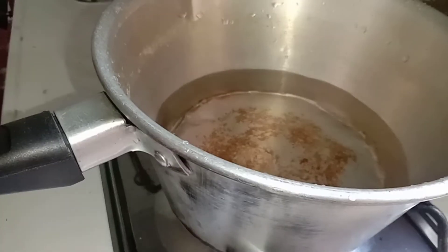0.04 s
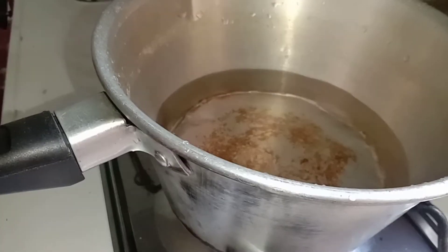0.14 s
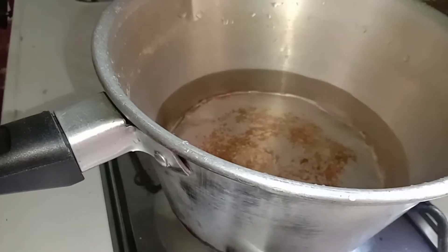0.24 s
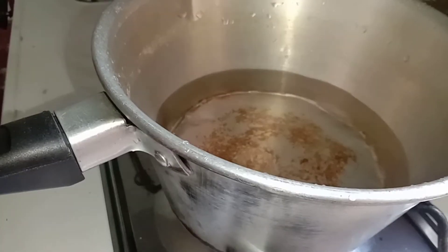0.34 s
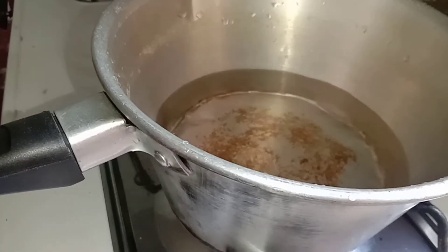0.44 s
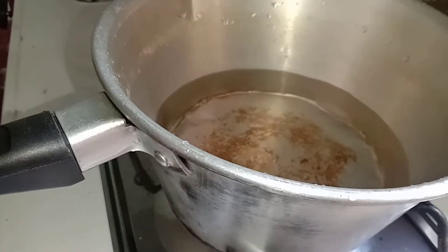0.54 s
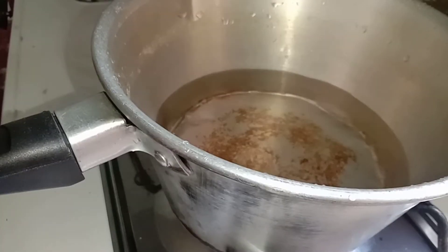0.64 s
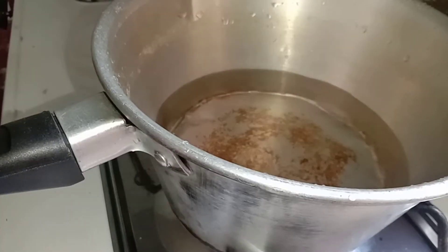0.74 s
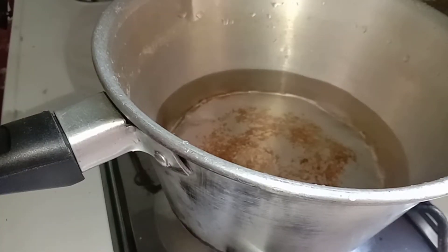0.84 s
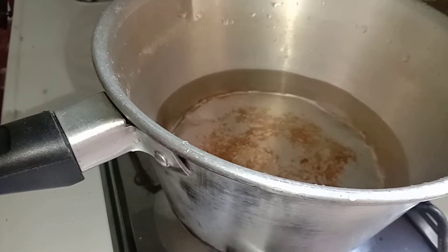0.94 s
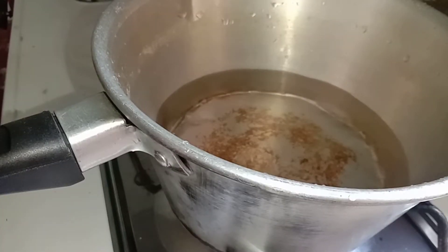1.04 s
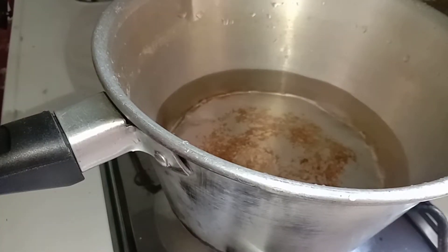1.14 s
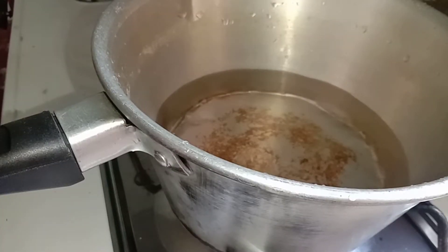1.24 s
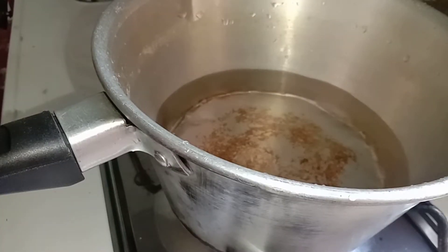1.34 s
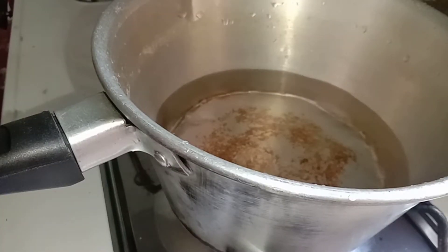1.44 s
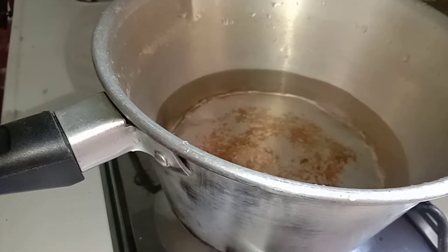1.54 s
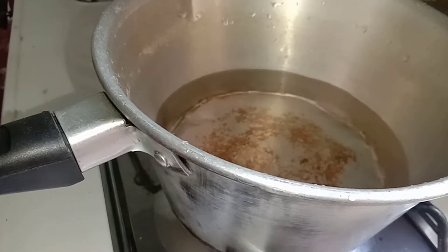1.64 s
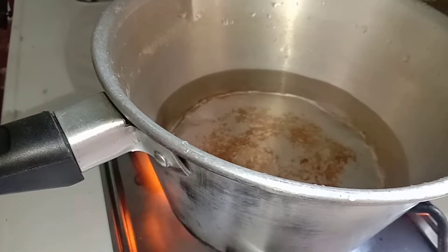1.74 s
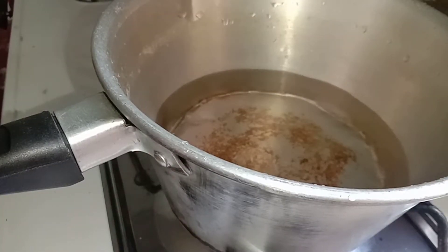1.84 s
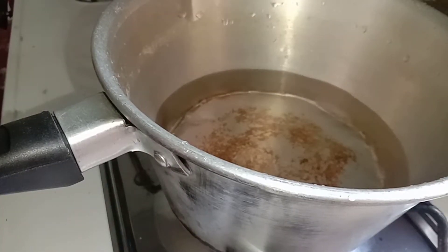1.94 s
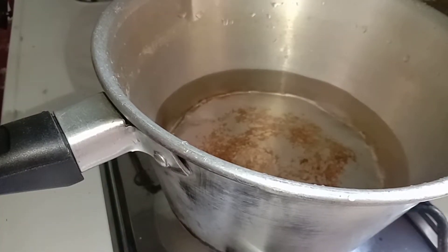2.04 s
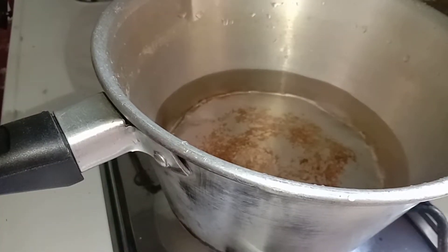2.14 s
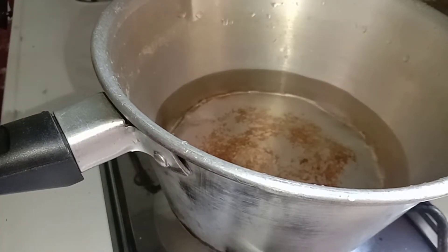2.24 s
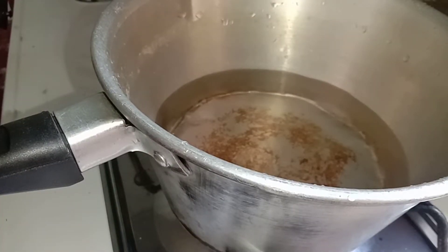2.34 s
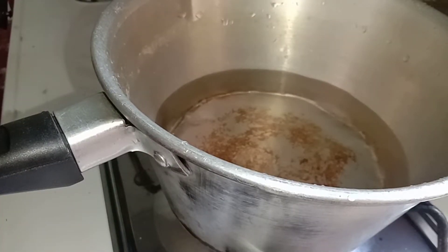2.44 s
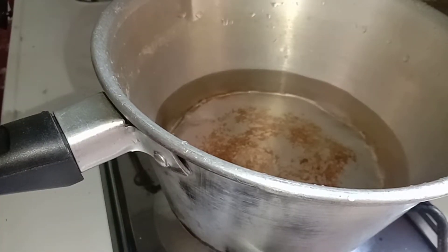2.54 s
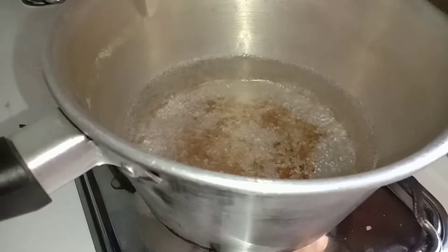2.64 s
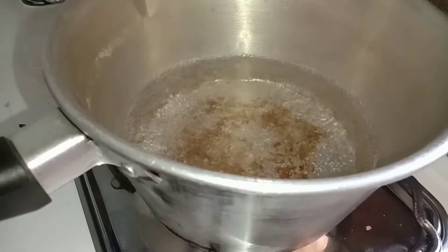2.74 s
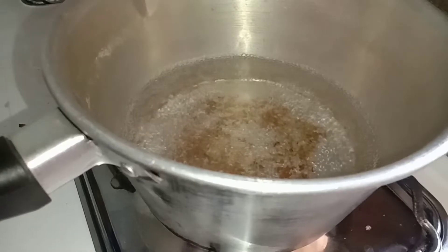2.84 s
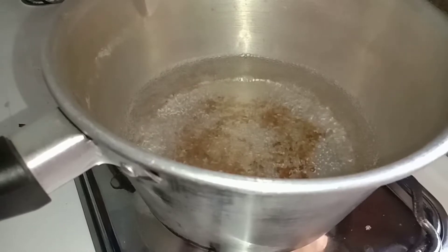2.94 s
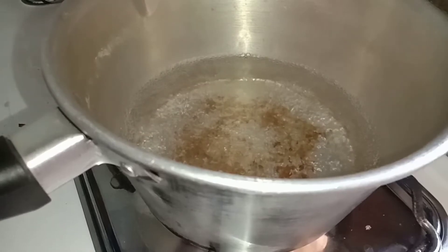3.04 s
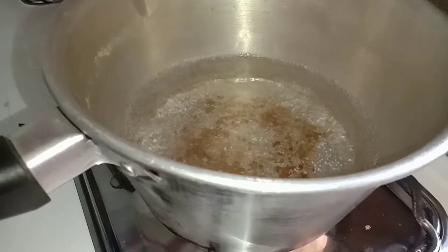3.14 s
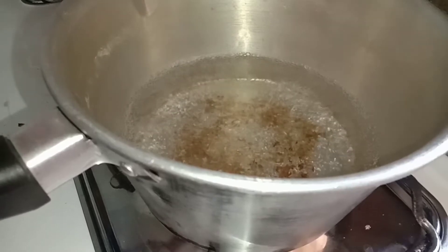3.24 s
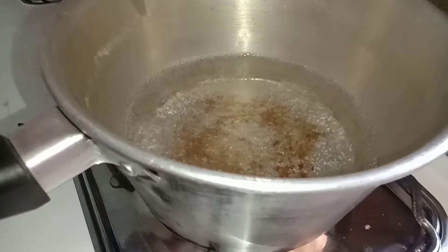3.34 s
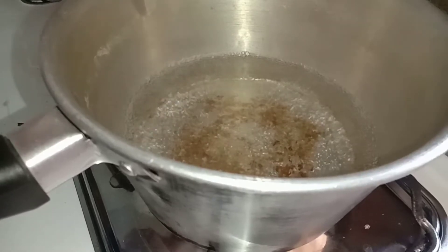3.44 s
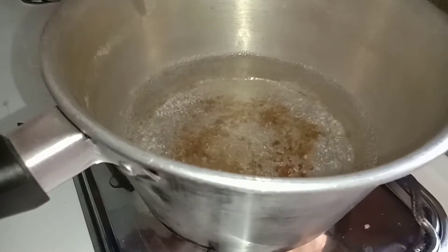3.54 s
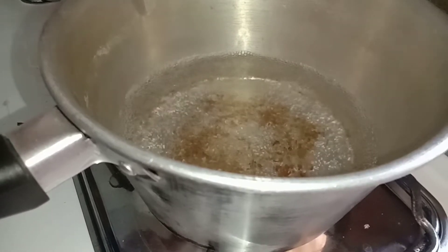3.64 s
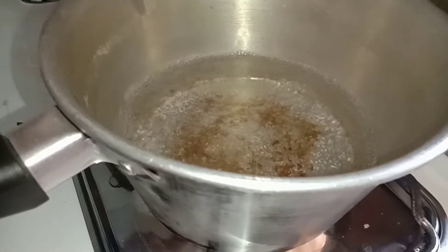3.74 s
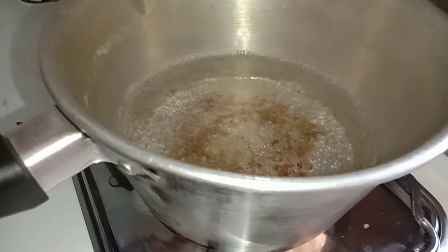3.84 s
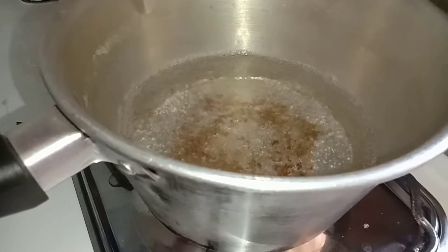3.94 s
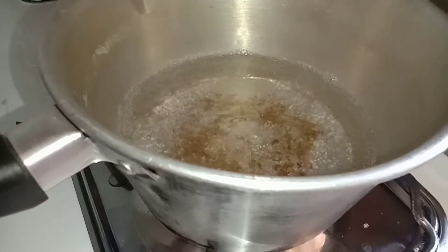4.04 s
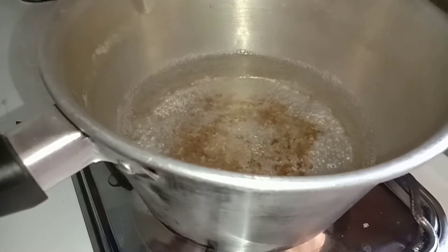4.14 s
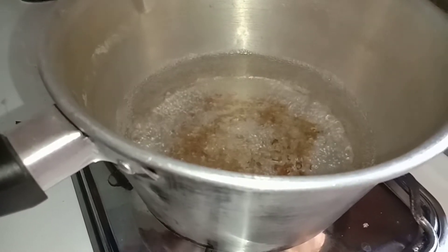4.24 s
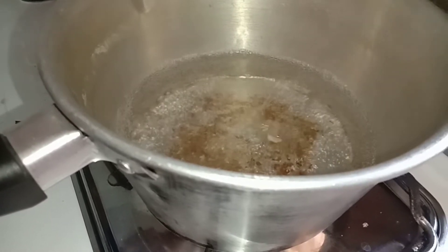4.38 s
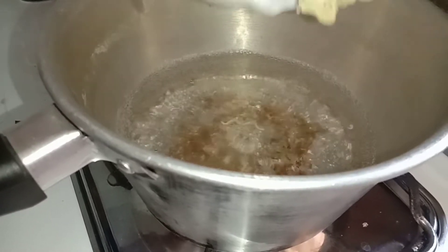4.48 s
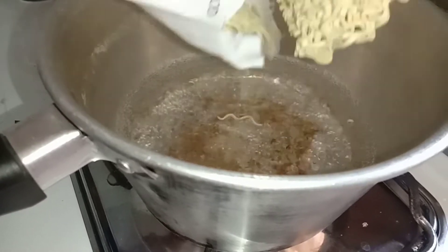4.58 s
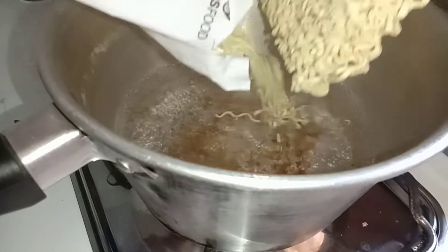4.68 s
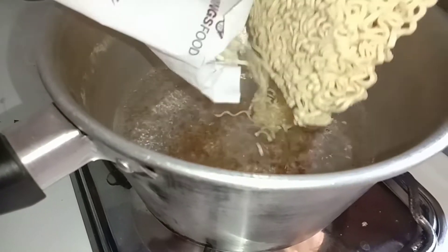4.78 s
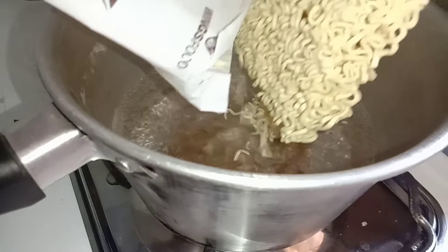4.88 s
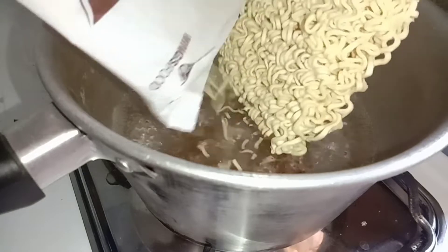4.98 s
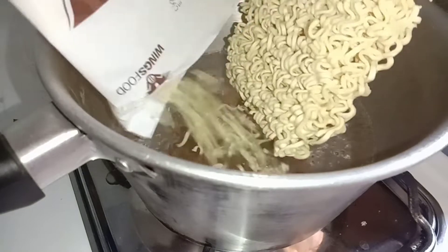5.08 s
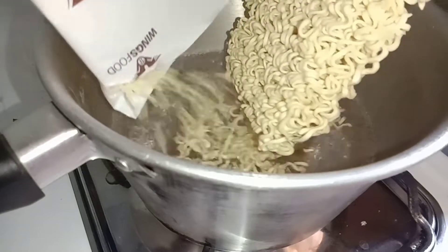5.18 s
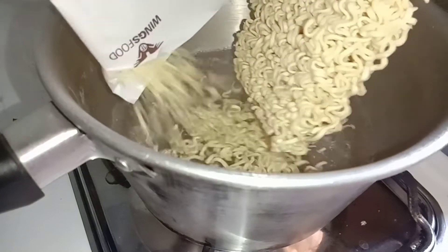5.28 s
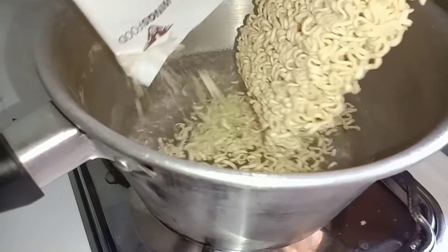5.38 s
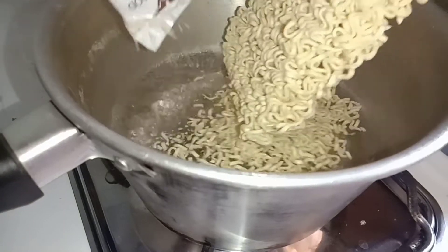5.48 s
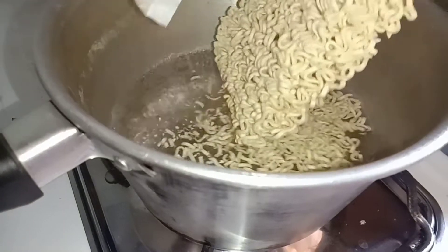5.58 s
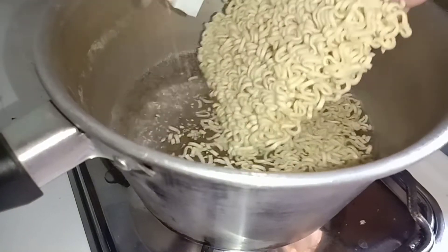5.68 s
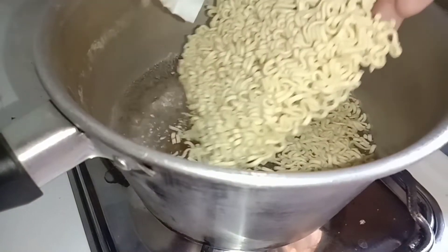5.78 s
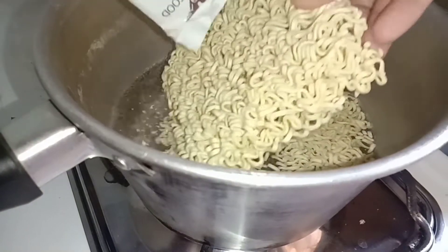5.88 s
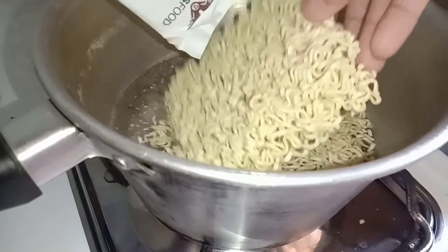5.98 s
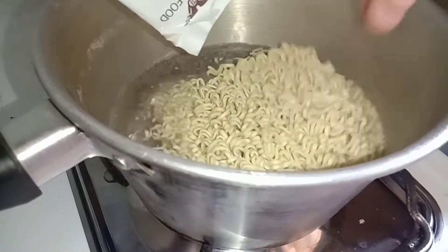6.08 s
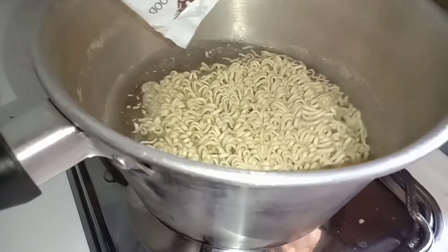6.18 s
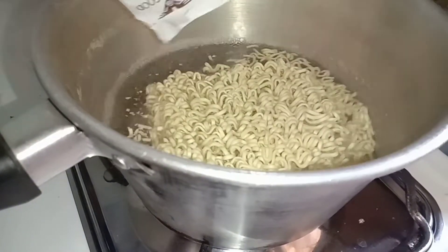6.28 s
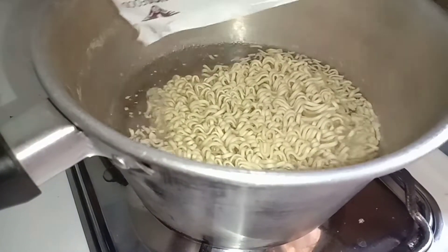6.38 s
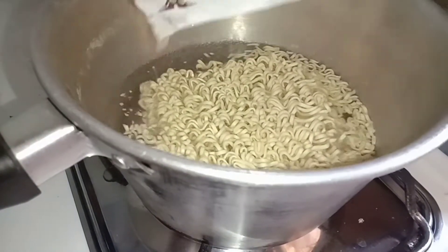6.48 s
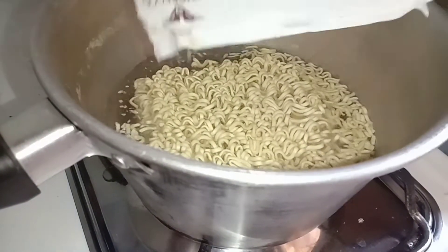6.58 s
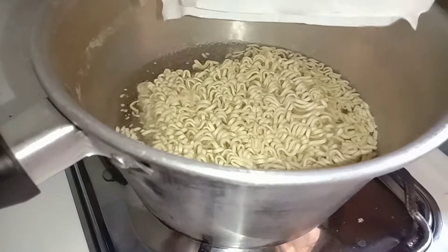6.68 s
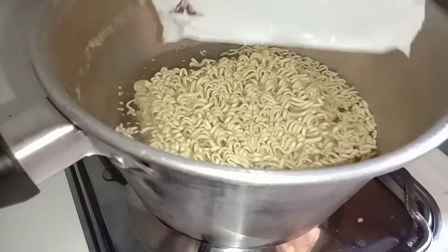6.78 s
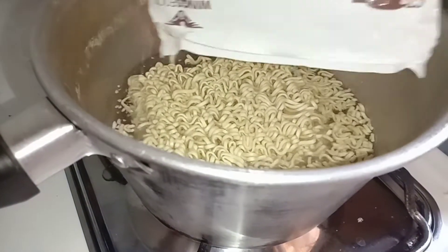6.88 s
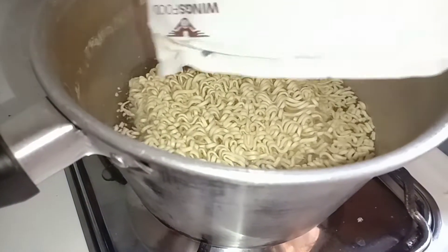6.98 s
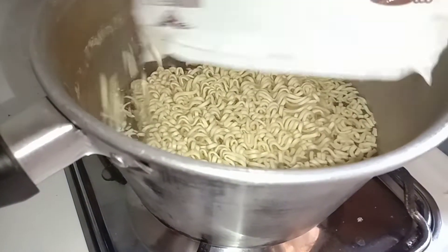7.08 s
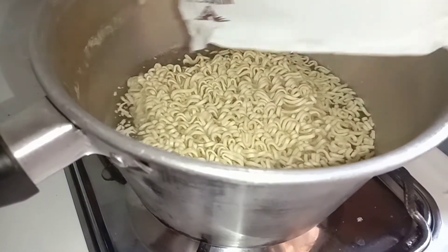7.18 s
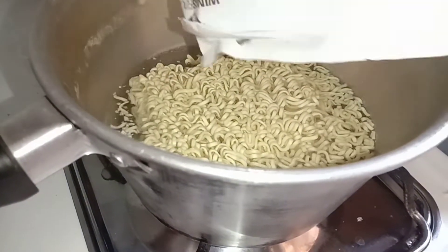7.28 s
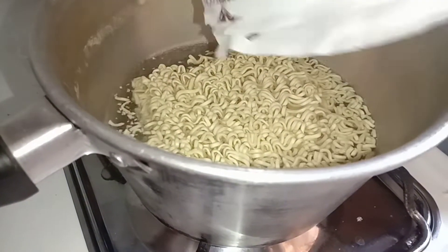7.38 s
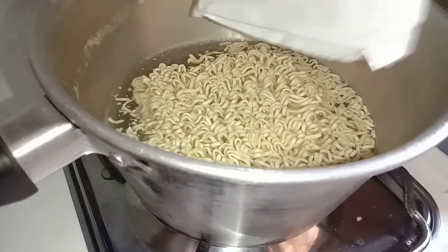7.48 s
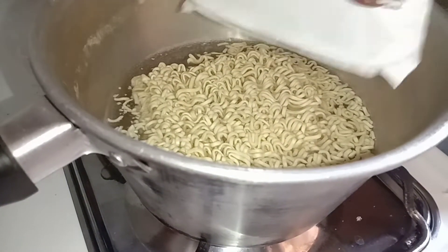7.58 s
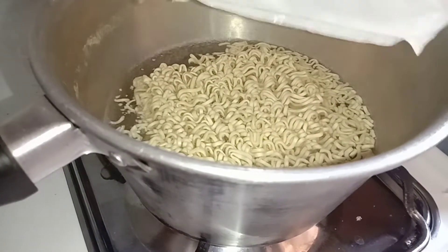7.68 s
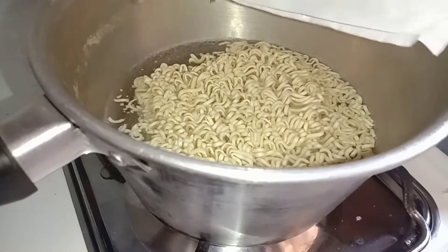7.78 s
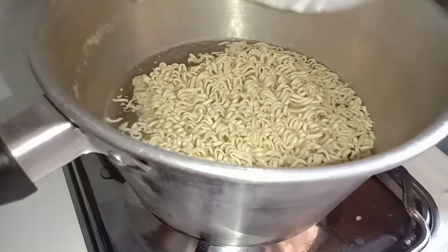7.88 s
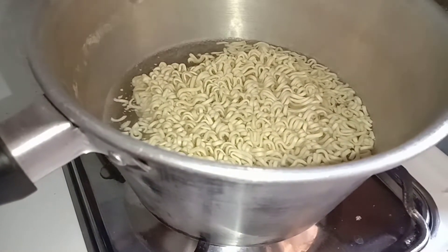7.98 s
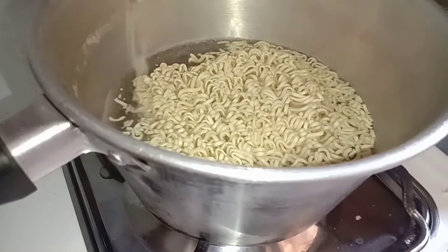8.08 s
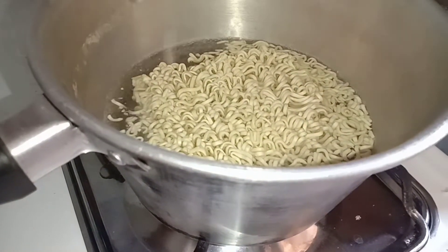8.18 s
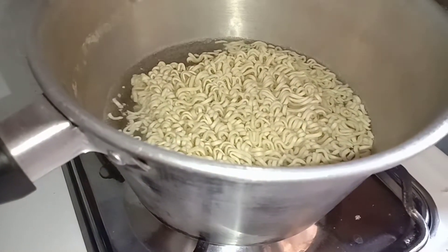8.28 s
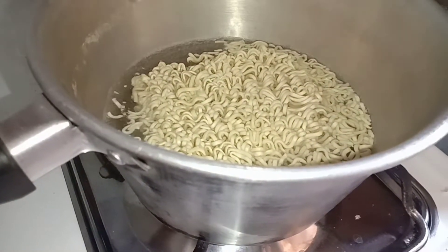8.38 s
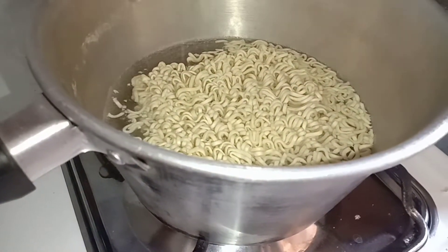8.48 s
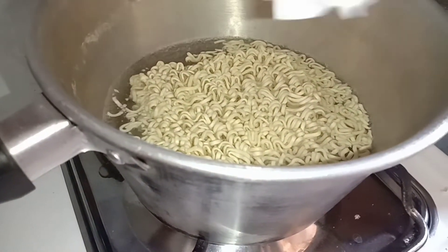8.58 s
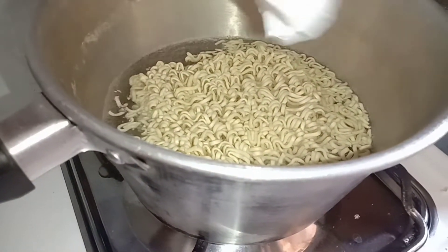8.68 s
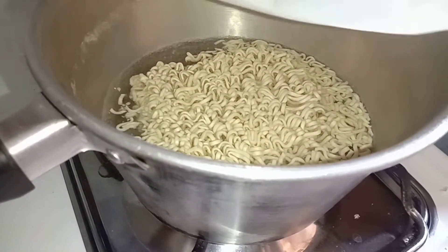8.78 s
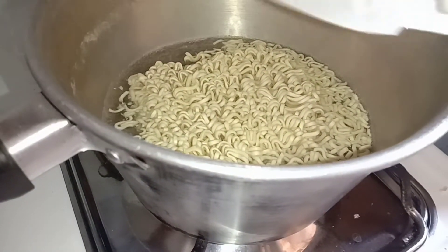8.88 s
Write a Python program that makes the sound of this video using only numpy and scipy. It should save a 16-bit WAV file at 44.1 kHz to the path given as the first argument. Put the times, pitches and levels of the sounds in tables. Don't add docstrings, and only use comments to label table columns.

```python
import sys
import numpy as np
from scipy import signal
from scipy.fft import rfft, irfft, next_fast_len
from scipy.io import wavfile
from scipy.ndimage import map_coordinates

SR = 44100
rng = np.random.default_rng(int(sys.argv[2]) if len(sys.argv) > 2 else 0)


def generate_wav(sig):
    pcm = np.round(np.clip(np.atleast_2d(sig).T, -1, 1) * 32767).astype(np.int16)
    wavfile.write(sys.argv[1], SR, pcm)


def volts_from_decibels(level):
    exponent = np.asarray(level, float) / 20
    return 10 ** exponent


N = 393372
T = np.arange(N) / SR
SIZE = next_fast_len(N + SR)
HZ = np.maximum(np.arange(SIZE // 2 + 1) * SR / SIZE, 1)

BANG_S, CUT_S = 1.5905, 2.535
BLOCK_S = 6.035

# [f/Hz, density/dB per Hz]
FILM_SPECTRUM = [(150, -25), (250, -26.5), (1080, 1.5), (1260, -2.5), (1820, -0.5), (3060, 0.5), (6140, -2),
                 (7190, -1), (13400, -16), (15300, -16), (16000, -42)]
# [f/Hz, width/Hz, boost/dB]
PORT_RESONANCES = [(1280, 124, 11.5), (3300, 1290, 4), (5440, 730, 5), (7200, 580, 5.5), (15170, 710, 9.5)]


def rms_one(x):
    return x / np.sqrt(np.mean(x ** 2) + 1e-20)


def in_time(table):
    s, *columns = np.transpose(table)
    return [np.interp(T, s, column) for column in columns]


def by_stage(values):
    return np.asarray(values)[(T > BANG_S) * 1 + (T > CUT_S)]


def on_hz(points):
    hz, db = np.transpose(points)
    return np.interp(np.log(HZ), np.log(hz), db)


def hump(hz, width_hz, db):
    return db / (1 + (2 * (HZ - hz) / width_hz) ** 2)


def colour(x, db):
    fold = irfft(np.maximum(db, -100) * np.log(10) / 20, SIZE)
    fold[1:SIZE // 2] *= 2
    fold[SIZE // 2 + 1:] = 0
    return irfft(rfft(x, SIZE) * np.exp(rfft(fold)), SIZE)[..., :N]


def band(x, low_hz, high_hz):
    return signal.sosfilt(signal.butter(2, [low_hz, high_hz], "band", fs=SR, output="sos"), x)


def white():
    return rng.standard_normal(N)


def noise(spectrum):
    phases = np.exp(2j * np.pi * rng.random(len(HZ)))
    return rms_one(irfft(volts_from_decibels(on_hz(spectrum)) * phases, SIZE)[:N])


def drift(rate):
    knots = rng.standard_normal(2000)
    coarse = map_coordinates(knots, [T[::32] * min(rate, 100) * 2 + 5], order=3)
    return np.interp(T, T[::32], coarse)


def mottled(x, patchy_db, rate):
    edges = 180 * 2 ** np.arange(0, 7, .5)
    return rms_one(sum(volts_from_decibels(patchy_db * drift(rate)) * band(x, low, high)
                       for low, high in zip(edges, edges[1:])))


def grains(per_s, spread_db):
    sizes = volts_from_decibels(spread_db * np.minimum(rng.exponential(1, N), 4.2)) * rng.choice([-1, 1], N)
    return sizes * (rng.random(N) < per_s / SR)


def click(s, db):
    out = np.zeros(N)
    out[int(s * SR)] = volts_from_decibels(db)
    return out


def dying(clicks, t60):
    return signal.lfilter([1], [1, -volts_from_decibels(-60 / (t60 * SR))], clicks + 1e-18)


def swells(rows, rise_db_per_s):
    t, power = T[::32], 1e-11
    for s, db, hold, fall in rows:
        before, after = np.maximum(s - t, 0), np.maximum(t - s - hold, 0)
        power = power + volts_from_decibels(2 * (db - rise_db_per_s * before - fall * after))
    return np.interp(T, t, 10 * np.log10(power))


def reverb(x, t60):
    t = np.arange(SR) / SR
    tail = rng.standard_normal(SR) * volts_from_decibels(-60 * t / t60) * np.clip(t / 0.011, 0, 1)
    tail = signal.lfilter([1], [1, -.4], tail)
    return signal.fftconvolve(x, tail / np.sqrt(np.sum(tail ** 2)))[:N]


def background():
    # [t/s, level/dB]
    draught = [(0.0, -61), (0.44, -54.5), (1.57, -54), (2.0, -49.5), (2.366, -52), (2.53, -37), (2.63, -62),
               (2.94, -44.5), (3.49, -51), (4.31, -52), (4.6, -59.5), (5.2, -53.5), (5.85, -63.5),
               (6.06, -58.5), (6.73, -57), (7.08, -57), (8.92, -48.5)]
    stages = [
        (-55.5, -64, 0.96),
        (-49.5, -55, 0.22),
        (-65.5, -70, 0.76),
    ]
    # [f/Hz, density/dB per Hz]
    rumble_spectrum = [(15, -45), (35, -12.5), (81, -11.5), (113, -1), (146, -2.5), (344, -19.5),
                       (400, -38), (520, -45), (880, -120)]
    # [f/Hz, density/dB per Hz]
    air_spectrum = [(120, -21), (200, -3), (413, -2.5), (524, -11.5), (1030, -8.5), (1250, -11),
                    (3000, -24.5), (3900, -54), (6600, -120)]
    # [f/Hz, density/dB per Hz]
    hiss_spectrum = [(880, -13), (1500, -1), (4920, -11), (5770, -16), (6370, -19.5), (7170, -13),
                     (8240, -28), (9470, -17), (16000, -68.5)]
    rumble_db, = in_time(draught)
    air_db, hiss_db, follows = by_stage(stages).T
    swing_db = follows * (rumble_db + 55)
    rumble = volts_from_decibels(rumble_db + 2.3 * drift(13)) * noise(rumble_spectrum)
    air = colour(white(), on_hz(air_spectrum) + hump(520, 60, 3))
    air = volts_from_decibels(air_db + swing_db + 3) * mottled(air, patchy_db=1.8, rate=9)
    hiss = volts_from_decibels(hiss_db + swing_db + 1.0 * drift(3.47)) * noise(hiss_spectrum)
    return rumble + air + hiss


def burner():
    db = -61 + 4 * T + 1.3 * drift(14.0)
    fade_in = np.clip(T / 0.061, 0, 1)
    return (T < CUT_S) * fade_in * volts_from_decibels(db) * rms_one(band(white(), 493, 552))


def engine():
    # [t/s, main order f/Hz, level/dB]
    course = [(0.0, 117.0, -65), (0.328, 115.7, -43.5), (0.95, 117, -45.5), (1.2, 118.3, -58),
              (1.55, 115.1, -66), (1.9, 116.5, -60), (2.082, 116.4, -44.5), (2.53, 116.5, -52.5),
              (2.63, 111.4, -58), (2.89, 110.5, -39.5), (4.25, 113.6, -48.5), (4.53, 111.3, -51),
              (4.8, 124.1, -94), (5.4, 110, -110)]
    upper_db = (-31, -12, -5.5)
    hz, main_db = in_time(course)
    phase = 2 * np.pi * np.cumsum(hz * (1 + .006 * drift(4))) / SR
    main = volts_from_decibels(1.5 * drift(6)) * np.sin(phase)
    upper = volts_from_decibels(by_stage(upper_db) + 2.0 * drift(6)) * np.sin(1.6 * phase)
    return volts_from_decibels(main_db + 0.5) * (main + upper)


def birds():
    # [t/s, length/s, start f/Hz, end f/Hz, level/dB]
    chirps = [(0.033, 0.17, 4670, 3950, -70), (1.38, 0.041, 4000, 3830, -55.5),
              (2.414, 0.093, 3300, 2880, -50.5), (0.127, 0.077, 3520, 2930, -55.5),
              (0.522, 0.13, 3480, 2735, -48), (0.902, 0.17, 4580, 4000, -62.5),
              (0.976, 0.061, 3400, 3080, -51.5), (1.395, 0.11, 3430, 2820, -50.5)]
    out = np.zeros(N)
    hoarse = 1 + .55 * rms_one(band(white(), 40, 350))
    for s, length, start_hz, end_hz, db in chirps:
        u = np.clip((T[:3 * SR] - s) / length, 0, 1)
        phase = 2 * np.pi * np.cumsum(start_hz + (end_hz - start_hz) * u) / SR
        out[:3 * SR] += volts_from_decibels(db) * np.sin(np.pi * u) * np.sin(phase)
    return 0.57 * out * hoarse + 0.45 * reverb(out * hoarse, t60=0.55)


def knob():
    # [t/s, peak level/dB, low f/Hz, high f/Hz]
    touches = [
        (0.186, -50, 405, 2310),
        (0.291, -55.5, 1910, 6060),
    ]
    out = 0
    for s, db, low_hz, high_hz in touches:
        u = np.maximum(T - s, 0) / 0.014
        out = out + volts_from_decibels(db) * u * np.exp(1 - u) * rms_one(band(white(), low_hz, high_hz))
    return out


def valve():
    opening = np.clip((T - 1) / 0.23 + .5, 0, 1) * (T < CUT_S)
    db = -67 - 9 * (T > BANG_S) + 2.0 * drift(6)
    return opening * volts_from_decibels(db) * rms_one(band(white(), 5680, 5900))


def ignition():
    # [f/Hz, density/dB per Hz]
    flare_spectrum = [(35, -83), (60, -15.5), (127, -0.5), (244, -15), (315, -4), (682, -12.5), (1280, -4),
                      (1780, -12.5), (3500, -6), (14900, -32.5), (16000, -48)]
    # [f/Hz, width/Hz, level/dB]
    hollows = [(4470, 530, -3.5), (8200, 660, -3.5), (10300, 2300, 1.5), (13000, 1800, -15.5)]
    # [f/Hz, level/dB, t60/s]
    modes = [(316, -10, .6), (374, -12, .6), (418, -11, .6), (1114, -10, .5), (1266, -21, .4),
             (1399, -14, .5), (1638, -11, .5), (3144, -15, .5), (3528, -11, 0.7)]
    bang_db, thump_db = -14, -2.5
    flare_db, hold_s, sag_db_per_s, fall_db_per_s = -20.5, 0.11, 18.5, 112

    since = np.maximum(T - BANG_S, 0)
    db = flare_db - sag_db_per_s * since
    db -= (fall_db_per_s - sag_db_per_s) * np.maximum(since - hold_s, 0)
    db = np.maximum(db, -13.5 - 410.5 * since)
    roar = rms_one(colour(noise(flare_spectrum), sum(hump(*hollow) for hollow in hollows)))
    bass, treble = band(roar, 40, 4200), band(roar, 8900, 22000)
    lean_db = -7.5 + 0.22 * (db - flare_db)
    flare = (T > BANG_S) * volts_from_decibels(db + 0.51 * drift(36.55)) * (bass + volts_from_decibels(lean_db + 18.5) * treble)

    hit = click(BANG_S, bang_db)
    crack = band(dying(hit, 0.084) * white(), 600, 12000)
    thump = volts_from_decibels(thump_db - bang_db) * dying(hit, 0.029) * np.sin(2 * np.pi * 125 * (T - BANG_S))
    out = flare + crack + thump
    for hz, mode_db, t60 in modes:
        out += volts_from_decibels(mode_db - 5) * dying(hit, t60) * np.sin(2 * np.pi * hz * T)
    return signal.sosfilt(signal.cheby2(12, 50, 15600, fs=SR, output="sos"), out)


def flame():
    growing = (T > BANG_S) * (T < CUT_S) * np.clip((T - BANG_S) / 0.7, 0, 1)
    return growing * volts_from_decibels(-49 + 2.0 * drift(8)) * rms_one(band(white(), 35, 75))


def simmer():
    # [f/Hz, density/dB per Hz]
    simmer_spectrum = [(2500, -25), (5300, -9), (5800, 4), (6300, -11), (7200, 6.5), (8200, -7), (10000, 2),
                       (13000, -40), (16000, -11)]
    return (T > CUT_S) * volts_from_decibels(-63 + 0.69 * drift(2.3)) * noise(simmer_spectrum)


def rustle():
    # [t/s, level/dB, hold/s, fall/dB per s]
    squeezes = [(2.709, -43, 0.054, 102), (2.819, -30, 0.16, 380), (3.15, -44, 0.077, 100),
                (3.241, -31.5, 0.24, 149), (3.602, -32, .01, 58), (3.732, -28.5, 0.059, 205),
                (3.941, -28.5, 0.012, 65), (4.19, -26, 0.0059, 249), (4.3, -43.5, 0.12, 100),
                (4.44, -35, 0.04, 57), (5.06, -32.5, 0.23, 117), (5.45, -45.5, 0.092, 394),
                (5.77, -55.5, 0.028, 323), (6.06, -48, 0.04, 100), (6.33, -62, 0.104, 105),
                (6.5, -34.5, 0.011, 258), (6.54, -42, 0.29, 100), (6.8, -33.5, 0.22, 350),
                (7.104, -27.5, 0.0069, 182), (7.27, -26.5, 0.013, 63), (7.5, -33.5, 0.041, 165),
                (7.678, -29, 0.0031, 257), (7.8, -35, 0.14, 354), (7.987, -32, 0.24, 260),
                (8.306, -32.5, 0.049, 253), (8.41, -30, 0.12, 97), (8.6, -30.5, 0.13, 150),
                (8.75, -33.5, 0.12, 144), (8.87, -31.5, 0.11, 100)]
    # [low f/Hz, high f/Hz]
    patches = [(250, 900), (900, 2000), (2000, 3200), (3200, 5000), (5000, 8000), (8000, 12000),
               (12000, 17000)]
    db = swells(squeezes, rise_db_per_s=302)
    treble_db = -9.5 - 0.19 * (np.maximum(db, -70) + 33)
    creases = rms_one(grains(1200 * volts_from_decibels(3.0 * drift(50)), spread_db=5.0))
    fizz = white()
    dealt = rng.random(N) * len(patches)
    out = 0
    for k, (low, high) in enumerate(patches):
        own = creases * volts_from_decibels(-7 * np.abs(dealt - k - .5))
        tail = dying(np.abs(own), 0.027) * 0.087 * fizz
        patch = band(own + tail + 0.06 * fizz, low, high)
        out = out + (volts_from_decibels(treble_db + 11.0) if low >= 8000 else 1) * patch
    return volts_from_decibels(db - 6.0) * rms_one(colour(out, on_hz(FILM_SPECTRUM)))


def snaps():
    # [t/s, peak level/dB, low part level/dB, ring f/Hz]
    opening = [(2.7152, -38.5, 1.5, 4000), (2.803, -15.5, -15, 5070), (2.8663, -25.5, -0.5, 3800),
               (2.9135, -9.5, -29, 5260), (2.9359, -15, -63, 2500), (2.9654, -16.5, -11.5, 6000),
               (2.9998, -13.5, -25, 2950), (3.059, -15.5, -26.5, 7560), (3.234, -27, 2.5, 6000),
               (3.309, -27, -5, 2500), (3.5906, -33.5, 1.5, 3750), (3.6132, -18, -10.5, 5640),
               (3.6351, -11, -40, 2970), (3.7244, -18, -68, 2940), (3.775, -19, -8, 2090),
               (3.8066, -14.5, -11, 2700), (3.8825, -12.5, -15, 5450), (3.9298, 1.5, -26.5, 2470),
               (4.1658, -16, -11.5, 2820), (4.1987, -28, 3.5, 3140), (4.3054, -13.5, -38, 5440),
               (4.3773, -24, -36, 6500), (4.4445, -14, -40, 7020), (4.9835, -22, -12, 4840),
               (5.1088, -17, -15.5, 3940), (5.608, -35, -22, 5540), (5.8652, -22.5, -39, 3540),
               (5.9325, -27.5, -18.5, 5000), (6.0611, -32, -9, 4000), (6.079, -23, -34, 3140)]
    # [t/s, peak level/dB, low part level/dB, ring f/Hz]
    crumpling = [(6.4804, -29, -11, 3080), (6.566, -25.5, -39, 6400), (6.745, -18.5, -19.5, 4550),
                 (6.7684, -15.5, -16, 3460), (6.799, -18.5, -14, 2960), (6.954, -11.5, -19, 4750),
                 (7.0003, -12, -18, 2830), (7.0724, -15, -24, 2780), (7.211, -16.5, -13.5, 2600),
                 (7.2406, -12, -19.5, 7600), (7.3274, -17, -11, 3350), (7.431, -29, -11, 2500),
                 (7.4535, -13.5, -19, 4550), (7.5288, -13, -13.5, 3400), (7.6417, -17, -37, 2960),
                 (7.757, -18.5, -16, 3300), (7.836, -16, -20, 4550), (7.98, -11, -17, 2290),
                 (8.047, -8, -19.5, 5740), (8.137, -18, -13, 3500), (8.171, -12, -31, 3900),
                 (8.1973, -19.5, -13, 2250), (8.2169, -14.5, -15, 3120), (8.2516, -19, -35, 6700),
                 (8.302, -22.5, -4.5, 6650), (8.3387, -16, -19, 3900), (8.372, -18.5, -4.5, 5030),
                 (8.5572, -23.5, -2.5, 3600), (8.714, -21, -13, 6650), (8.8547, -16, -12, 4970)]
    # [t/s, peak level/dB, low part level/dB, ring f/Hz]
    ticks = [(2.7572, -30, -13, 3600), (3.1156, -31, -27, 6750), (4.3224, -21.5, -32, 5250),
             (4.5216, -26, -24, 3640), (4.7474, -29.5, -19, 2020), (4.951, -32, -25, 3900),
             (5.457, -44, -12, 4030), (5.494, -32, -20, 2960), (5.5397, -39, -21, 3000),
             (5.6989, -41, -21, 5840), (5.7697, -39, -25, 6860), (5.799, -49, -30, 5860),
             (6.4996, -23.5, -25, 2400), (6.6924, -31, -23, 7500), (7.1467, -19.5, -13, 7200),
             (7.2968, -19, -13, 4500), (7.399, -21, -10.5, 4100), (7.878, -22, -10.5, 3750),
             (7.917, -21, -18, 3400), (8.2833, -27, -11, 4080), (8.6275, -28.5, -3, 3120),
             (8.787, -13, -19, 3300), (8.911, -14, -31, 3060)]
    # [t/s, peak level/dB, low part level/dB, ring f/Hz]
    small_creases = [(2.684, -39, -16, 5270), (2.8499, -20, -16, 3630), (3.1472, -33.5, -14, 6400),
                     (3.3928, -24, -11, 2930), (3.4063, -23, -7, 2950), (3.4455, -21.5, -6.5, 2050),
                     (3.6603, -27, -27, 5550), (3.746, -15.5, -20, 3470), (3.984, -21, -13, 2000),
                     (4.0008, -22, -20, 2510), (4.0235, -19, -14.5, 2500), (4.25, -36, -22, 6600),
                     (4.6558, -41, -12, 2030), (4.8289, -45, -20, 7390), (4.8774, -45, -12, 5860),
                     (5.1642, -18, -28, 2100), (5.2837, -27, -21, 2120), (6.379, -43, -16, 7000),
                     (6.439, -45, -20, 7100), (6.8686, -29, -7, 6650), (7.089, -24.5, -1, 5360),
                     (7.1152, -26, -19, 7300), (7.1834, -20, -21, 2880), (7.2743, -26, -29, 3550),
                     (7.4794, -23, -6, 3670), (7.5562, -20, -19, 3340), (7.5797, -22.5, -23, 2520),
                     (7.6804, -19, -9, 3600), (7.7406, -20, -20, 3060), (7.7967, -22, -10, 3100),
                     (8.013, -20, -13, 3640), (8.4342, -21, -24, 6600), (8.4698, -26, -4, 5230),
                     (8.644, -21.5, -5, 3380), (8.8184, -17, -21, 2800)]
    # [t/s, peak level/dB, ring f/Hz]
    clustered = [(2.8236, -12, 2650), (2.877, -27, 4650), (2.928, -29, 5300), (2.9432, -26, 3650),
                 (3.011, -19, 2900), (3.2614, -18, 2020), (3.3253, -14, 2940), (3.3421, -13, 2070),
                 (3.359, -23, 2020), (3.3775, -25, 2980), (3.4207, -28, 6990), (3.432, -21, 2000),
                 (3.4625, -21, 3010), (3.487, -26, 5350), (3.498, -20, 5200), (7.0242, -19, 5580),
                 (7.0496, -28, 3670), (7.1031, -16.5, 7200), (7.124, -27, 7370), (8.3864, -16, 3100),
                 (8.3992, -16, 5430), (8.5787, -16, 7300), (8.7244, -8.5, 5660), (8.7445, -18, 5680),
                 (8.891, -16, 7270)]
    # [t/s, peak level/dB, ring f/Hz]
    followers = [(3.872, -16, 6940), (7.3356, -14.5, 2470), (7.4704, -22, 3140), (7.5426, -16, 3100),
                 (7.8912, -21, 3670)]
    rows = list(opening) + list(crumpling) + list(ticks) + list(small_creases)
    rows += [(s, db - 4, -14, hz) for s, db, hz in list(clustered) + list(followers)]

    count, length = len(rows), 4000
    out, t = np.zeros(N + length), np.arange(length) / SR
    leads_s = .001 * volts_from_decibels(rng.uniform(-6, 5, count))
    sizes = volts_from_decibels(4.06 * np.minimum(rng.exponential(1, (count, length)), 4.0))
    fray = rng.standard_normal((count, length)) * sizes * 0.68
    t60s = .018 * volts_from_decibels(2.5 * rng.standard_normal(count))
    cracks = volts_from_decibels(9 + 2.5 * rng.standard_normal(count))
    broad, low = band(fray, 770, 9100), band(fray, 473, 2640)
    port_tone = 0.05 * np.sin(2 * np.pi * PORT_RESONANCES[0][0] * t)
    for k, (s, peak_db, low_db, hz) in enumerate(rows):
        lead, t60 = leads_s[k], t60s[k]
        ping = np.sin(2 * np.pi * hz * t) * volts_from_decibels(-60 * t / .014)
        bright = 0.57 * band(fray[k], hz / 2.26, min(hz * 1.5, 17000)) + 0.49 * broad[k] + 1.12 * ping
        shape = np.clip(t / lead, .1, 1) ** 2 * volts_from_decibels(-60 * np.maximum(t - lead, 0) / t60)
        crack = band(np.arange(length) == int(lead * SR), hz / 2.4, min(hz * 2.1, 15500))
        crack = cracks[k] * volts_from_decibels(min(peak_db + 28, 0)) * crack
        thud = volts_from_decibels(low_db + 7.5) * (low[k] + port_tone) * volts_from_decibels(-60 * t / (t60 + 0.13))
        at = int(s * SR)
        out[at:at + length] += volts_from_decibels(peak_db - 8.5) * (bright * shape + crack + thud)
    return out[:N]


def tears():
    # [t/s, length/s, level/dB, centre f/Hz, width/octaves]
    runs = [(2.80, 0.033, -34.5, 2920, 2.1), (2.865, 0.012, -31, 4500, 1.9), (2.895, .01, -32, 6000, 1.5),
            (2.958, 0.011, -45, 5000, 2.5), (3.225, 0.028, -33.5, 4400, 1.7),
            (3.325, 0.025, -34.5, 3000, 2.6), (3.59, 0.0098, -35, 4000, 1.8), (3.80, 0.011, -35, 3500, 4.4),
            (3.885, 0.0092, -27.5, 6500, 1.6), (3.934, 0.011, -23, 3130, 1.8),
            (4.162, 0.011, -30.5, 3500, 1.6), (4.195, 0.027, -33, 3000, 2.2),
            (4.306, 0.033, -34.5, 4730, 0.17), (4.377, 0.016, -30.5, 5970, 2.8),
            (4.444, 0.012, -21.5, 4830, 3), (4.55, 0.23, -44, 1450, 0.77), (4.79, 0.015, -41.5, 1370, 0.54),
            (4.934, 0.011, -39.5, 3800, 0.48), (5.45, 0.026, -50.5, 1400, 0.28),
            (5.535, .035, -53, 3200, 0.63), (5.605, 0.0078, -48, 1285, 0.1),
            (5.934, 0.0085, -49, 4960, 1.1), (5.867, 0.0029, -35.5, 3480, 0.2),
            (6.062, 0.028, -37.5, 3430, 1.6), (7.64, 0.097, -44.5, 403, 0.27),
            (7.745, 0.041, -35.5, 3220, 2.2), (8.135, 0.0076, -26.5, 4500, 2),
            (8.20, 0.037, -34.5, 2500, 3.7), (8.30, 0.03, -34, 3500, 2.3), (8.363, 0.039, -26.5, 3750, 1.7),
            (8.55, 0.045, -31, 5030, 1.7), (8.62, 0.045, -36, 3180, 0.71), (8.713, 0.041, -26, 5250, 1.7),
            (8.788, 0.013, -30, 3180, 1.2), (8.848, 0.019, -28, 4800, 1.6),
            (8.905, 0.0071, -28.5, 3000, 2.5)]
    size = 12000
    out, t = np.zeros(N + size), np.arange(size) / SR
    sizes = volts_from_decibels(4.3 * np.minimum(rng.exponential(1, (len(runs), size)), 4.5))
    grain = rng.standard_normal((len(runs), size)) * sizes
    for k, (s, length, db, hz, octaves) in enumerate(runs):
        flicker = volts_from_decibels(2.0 * np.repeat(rng.standard_normal(100), 120))
        fall_db = 147 * np.minimum(t, .03) + 60 * np.maximum(t - length, 0) / 0.025
        shape = np.clip(t / 0.0012, 0, 1) * volts_from_decibels(3.0 - fall_db) * flicker
        half = 2 ** (octaves / 2)
        crackle = rms_one(band(grain[k], hz / half, min(hz * half, 17000)))
        at = int(s * SR)
        out[at:at + size] += volts_from_decibels(db - 6.0) * shape * crackle
    return out[:N]


def pour():
    # [t/s, level/dB, hold/s, fall/dB per s]
    pours = [
        (4.56, -38.5, 0.03, 70),
        (5.07, -29.5, 0.059, 64),
        (6.08, -62, 0.03, 57),
    ]
    # [f/Hz, density/dB per Hz]
    crumb_spectrum = [(150, -55), (250, -33), (1000, -7), (1280, -5), (1760, -5), (3520, -16), (7440, -17),
                      (12800, -30), (16000, -32)]
    db = swells(pours, rise_db_per_s=112)
    db = db - 250 * np.clip(T - 5.32, 0, .15) * (T < pours[-1][0] - .3)
    patter = rms_one(grains(4000 * volts_from_decibels(4.5 * drift(25)), spread_db=2.5)) + 0.31 * white()
    return volts_from_decibels(db - 4.0) * rms_one(colour(patter, on_hz(crumb_spectrum)))


def block():
    u = np.maximum(T - BLOCK_S, 0)
    return volts_from_decibels(-38 - 60 * u / .22) * np.clip(u / 0.0093, 0, 1) * np.sin(2 * np.pi * 105 * u)


def slide():
    # [t/s, level/dB, hold/s, fall/dB per s]
    strokes = [
        (6.17, -45, 0.048, 154),
    ]
    drag = rms_one(grains(5000 * volts_from_decibels(0.63 * drift(30)), spread_db=3.0)) + 0.52 * white()
    drag = rms_one(colour(drag, on_hz(FILM_SPECTRUM) + hump(10500, 8000, 8.5)))
    contact = np.clip((T - BLOCK_S) / 0.023, 0, 1) * (T < BLOCK_S + .6)
    return volts_from_decibels(swells(strokes, rise_db_per_s=70) + 1.6 * drift(40)) * drag * contact


def scene():
    far_width_db = (-24, -28.5, -28)
    far = background() + burner() + engine() + birds() + valve() + flame() + simmer()
    near = knob() + rustle() + pour() + block()
    close = snaps() + tears()
    room = volts_from_decibels(-11) * reverb(near + volts_from_decibels(-6.5) * close, t60=0.23)
    mid = near + close + room + ignition() + far + slide()
    wide = volts_from_decibels(by_stage(far_width_db)) * band(reverb(far, .05), 300, 5000)
    return np.array([mid + wide, mid - wide])


def top_cut(x):
    return signal.sosfilt(signal.butter(12, 16650, fs=SR, output="sos"), x)


def record(dry):
    # [f/Hz, level/dB]
    side_part = [(100, -48), (600, -38.5), (2500, -40), (4000, -35.5), (5000, -28), (8000, -30.5),
                 (11000, -17.5), (14000, -12), (15500, -12)]
    bass_cut_db = -20 * np.log10(1 + (50 / HZ) ** 3)
    top_cut_db = -22 / (1 + np.exp(np.minimum((15900 - HZ) / 60, 50)))
    port_db = sum(hump(*peak) for peak in PORT_RESONANCES)
    mid_wide = np.array([dry[0] + dry[1], dry[0] - dry[1]]) / 2
    mid, wide = colour(mid_wide, bass_cut_db + top_cut_db + port_db)
    side = wide + colour(reverb(mid, 0.015), on_hz(side_part))
    self_noise = volts_from_decibels(-80) * rms_one(band(rng.standard_normal((2, N)), 9000, 15500))
    gate = (T < CUT_S) + np.clip((T - 2.624) / 0.017, 0, 1)
    mix = gate * (np.array([mid + side, mid - side]) + self_noise)
    return top_cut(0.83 * np.tanh(mix / 0.99))


dry = scene()
out = record(dry)
generate_wav(out)
```